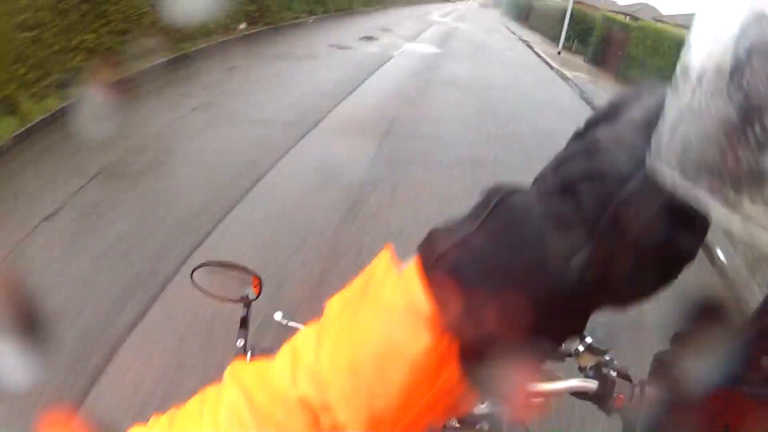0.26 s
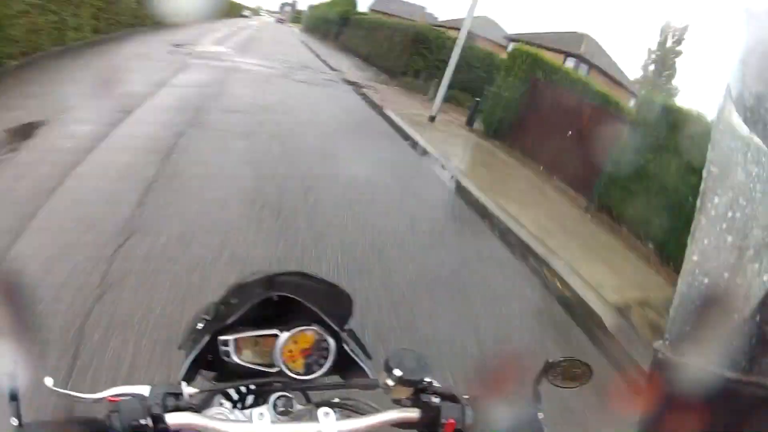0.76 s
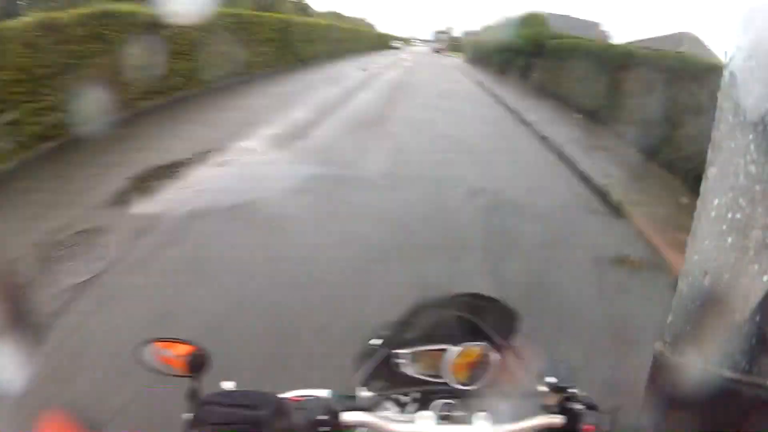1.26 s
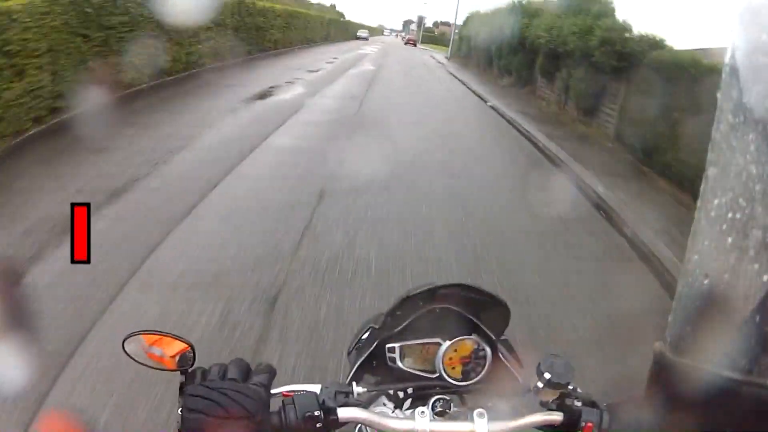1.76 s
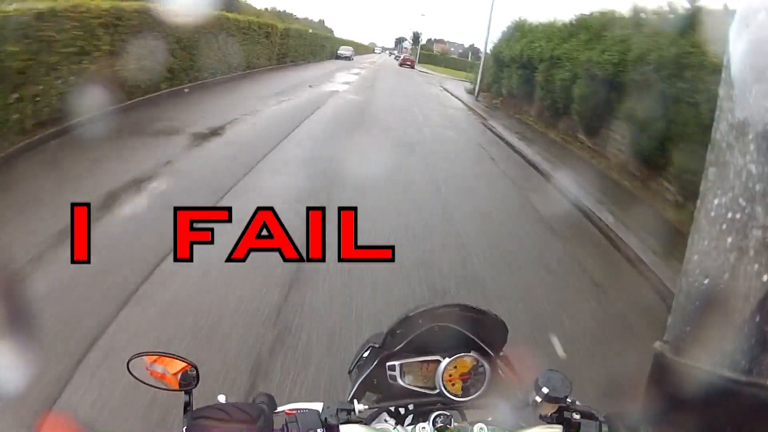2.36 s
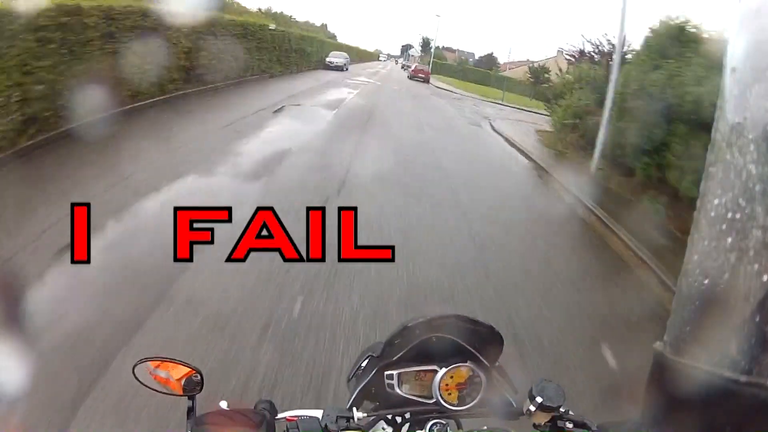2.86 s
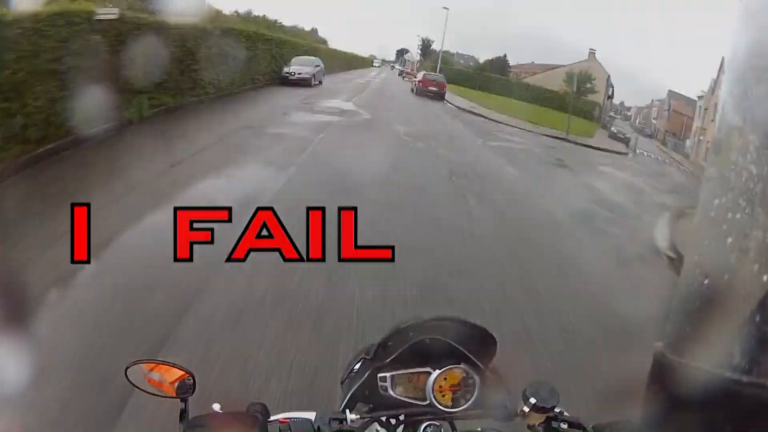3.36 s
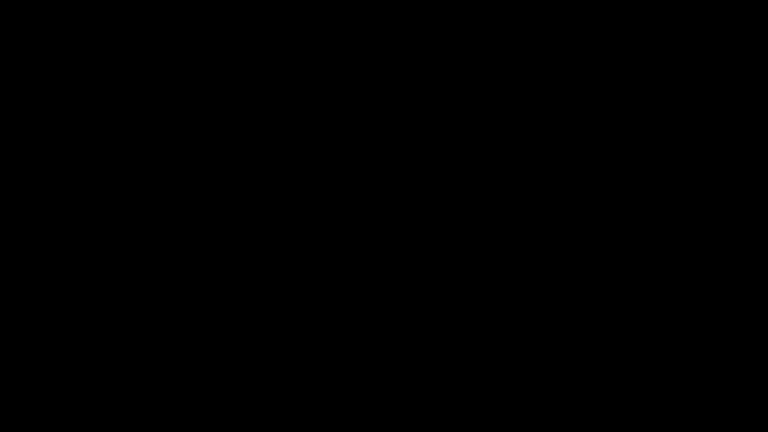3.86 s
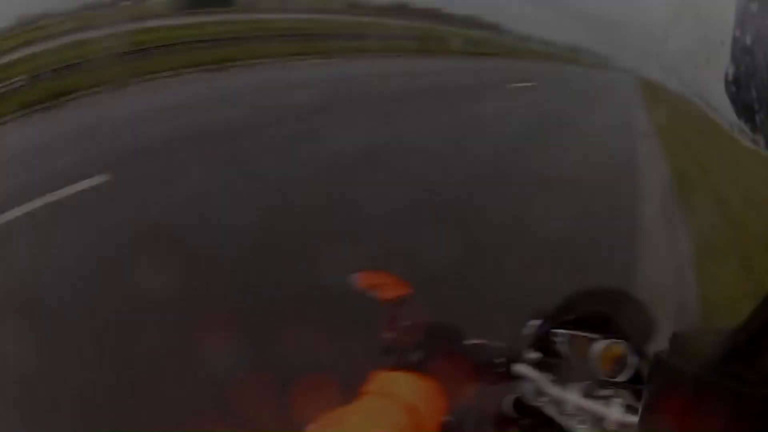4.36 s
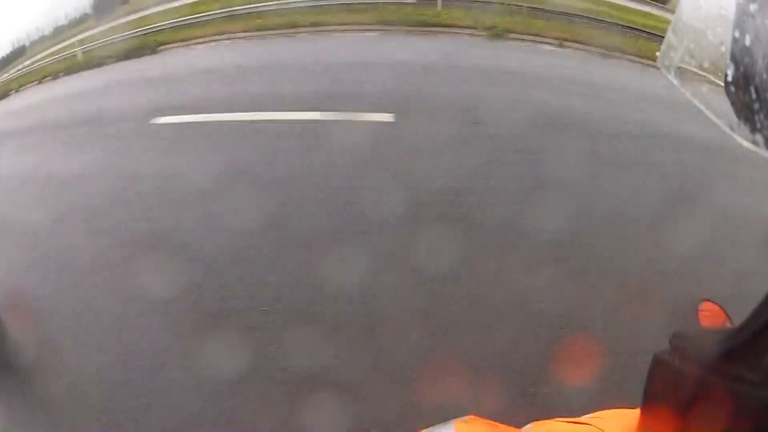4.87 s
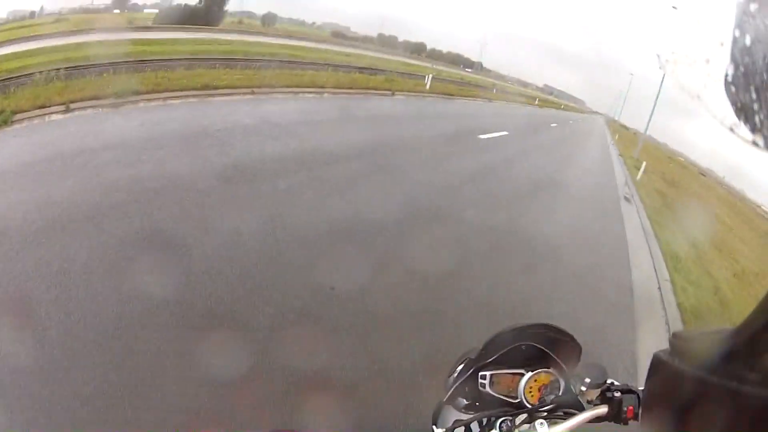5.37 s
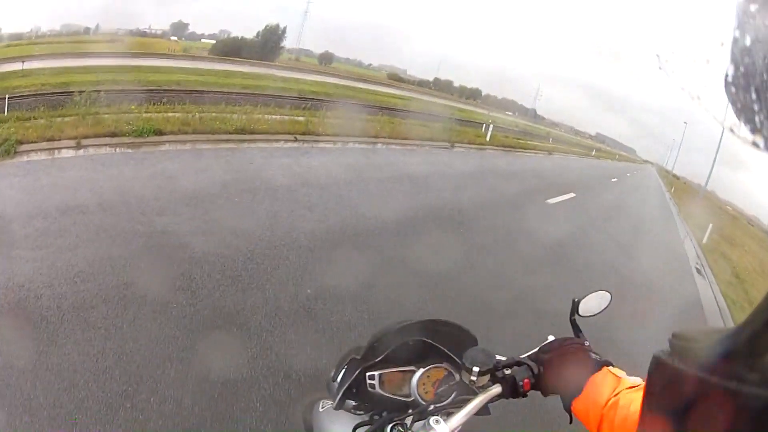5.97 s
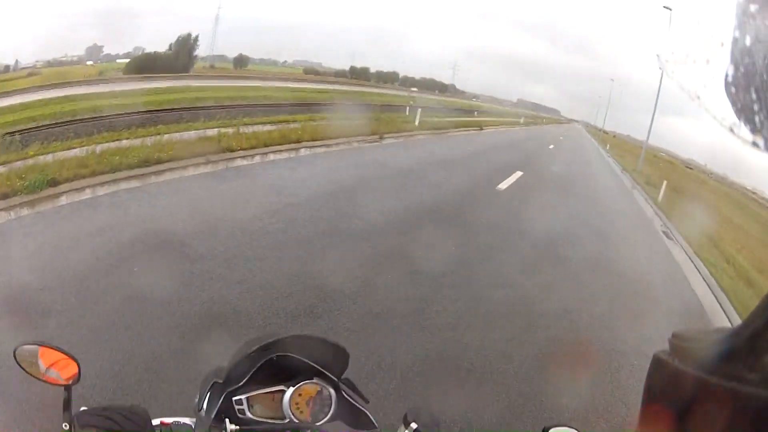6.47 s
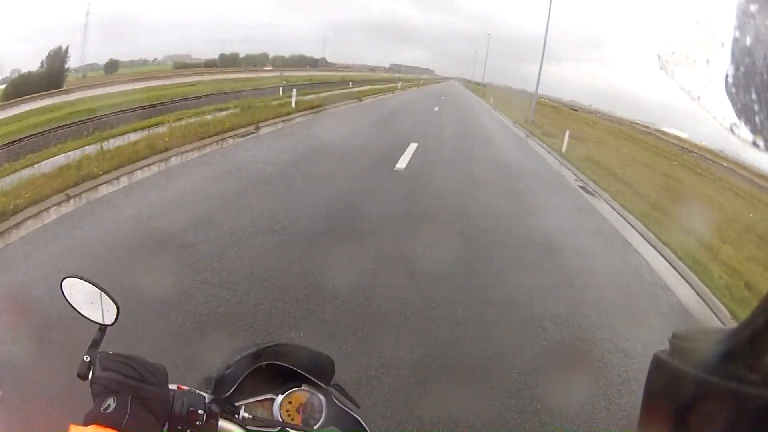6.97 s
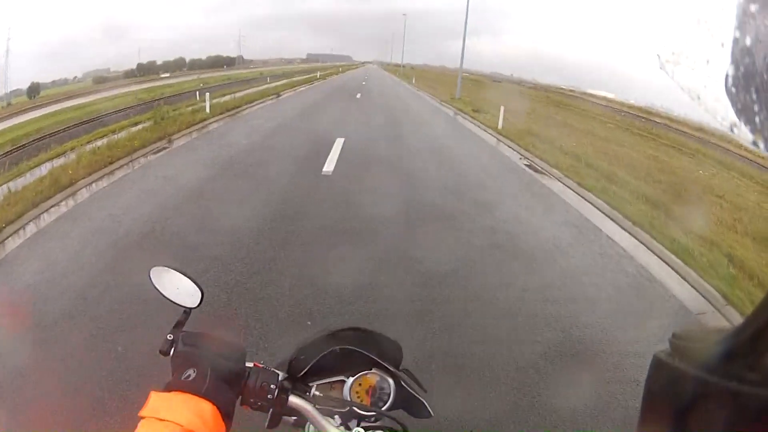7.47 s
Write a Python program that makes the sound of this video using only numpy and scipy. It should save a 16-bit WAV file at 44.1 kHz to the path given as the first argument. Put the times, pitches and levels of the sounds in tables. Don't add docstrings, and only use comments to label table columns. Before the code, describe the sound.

A helmet microphone in a sealed housing hears a fast motorcycle ride in the rain. From 0 s wind buffets and roars, with a high-revving engine drone and a wet glove scrubbing the casing. At about 0.3-0.4 s the glove knocks hard and the level ducks sharply, then recovers as the engine surges again until about 1.1 s. Gusty wind then dominates, with bright raindrop clicks and heavier knocks near 1.4, 2.1, 2.4 and 3.3 s. Around 3.8 s the ride fades out and a much quieter roadside fades in. A second engine rolls up with a low hum and faint whistle; vehicles wash past on wet tyres at about 4.55 and 5 s, the first with a falling note. From 4.7 s to the end the bike idles low and steady, with faint gear whine, light breeze, small rocking rumbles and soft drops. The sound is boxy, gritty and nearly mono.

```python
import sys
import numpy as np
from scipy import signal
from scipy.fft import rfft, irfft, next_fast_len
from scipy.io import wavfile
from scipy.ndimage import uniform_filter1d, map_coordinates

SR = 44100
rng = np.random.default_rng(int(sys.argv[2]) if len(sys.argv) > 2 else 0)


def volts_from_decibels(level):
    exponent = np.asarray(level, float) / 20
    return 10 ** exponent


def put_to_file(sound):
    columns = np.atleast_2d(sound).T
    safe = np.clip(columns, -1, 1)
    whole_steps = np.round(safe * 32767)
    wavfile.write(sys.argv[1], SR, whole_steps.astype(np.int16))


N = 340452


def unit(x):
    return x / np.sqrt(np.mean(x ** 2) + 1e-20)


def along(points, hz):
    f, v = np.transpose(points)
    return np.interp(np.log(hz + 1), np.log(f + 1), v)


def curves(rows):
    s, *cols = np.transpose(rows)
    t = np.arange(N) / SR
    on = uniform_filter1d(1. * ((t >= s[0]) & (t <= s[-1])), size=400)
    return [np.interp(t, s, c) for c in cols] + [on]


def swells(rows):
    t = np.arange(0, N + 32, 32) / SR
    db = sum(rise * np.exp(-((t - s) / half) ** 2) for s, rise, half in rows)
    return np.interp(np.arange(N) / SR, t, db)


def wobble(rate):
    steps = np.arange(0, N + 32, 32)
    knots = rng.standard_normal(int(N * rate / SR) + 4)
    return np.interp(np.arange(N), steps, map_coordinates(knots, [steps * rate / SR]))


def filtered(x, response):
    m = next_fast_len(N + SR // 2)
    return irfft(rfft(x, m) * response(np.fft.rfftfreq(m, 1 / SR)), m)[..., :N]


def rush(response, patchy_db):
    z = signal.stft(rng.standard_normal(N), nperseg=512)[2]
    field = uniform_filter1d(rng.standard_normal(z.shape), size=5, axis=0)
    field = uniform_filter1d(field, size=8, axis=1)
    patchy = signal.istft(z * volts_from_decibels(patchy_db * unit(field)), nperseg=512)[1][:N]
    return unit(filtered(patchy, response))


HOUSING_HZ = [730, 950, 1175, 1600, 2430, 3070, 3710, 4750, 5300]
# width_hz, wind_db, rest_db, traffic_db, struck_db
HOUSING = [(194, -6.5, -5.5, -5.5, -3.5), (220, -5, -1, -2, -16), (221.4, -3, -0.5, 6, -6),
           (702, -10, -2, -3.5, -11), (605, 1, -3.5, -14, 33.5), (657, -9, -11, -19, 6),
           (306, -2.5, -5, -7, 10), (850, -7, -14, -18.5, 4.5), (725, -8, -15.5, -23, -3)]
WIND, REST, TRAFFIC, STRUCK = 1, 2, 3, 4


def resonances(f, column, damping=1):
    peaks = []
    for hz, row in zip(HOUSING_HZ, HOUSING):
        loss = 1j * f * row[0] * damping
        peaks.append(volts_from_decibels(row[column]) * (loss / (hz * hz - f * f + loss)) ** 2)
    return np.array(peaks)


def housing(column):
    return lambda f: np.linalg.norm(resonances(f, column), axis=0)


def shake():
    return rush(lambda f: (f * 11 / (38.6 ** 2 - f * f + 1j * f * 11)) ** 2, patchy_db=1.5)


# pitch_hz, density_db_per_hz
BREEZE = [(56, -36), (95, -4), (156, -9), (225, -14), (330, -16), (573, -23), (700, -25.5), (910, -39),
          (1540, -120)]
# centre_s, rise_db, half_length_s
WAKES = [
    (4.61, 17, 0.076),
    (4.85, 18, 0.41),
]
# centre_s, rise_db, half_length_s
SHIFTS = [(6.0, 8, .1), (6.3, 11, 0.075), (6.68, 15, 0.066), (6.85, 8, 0.045), (7.1, 8, 0.095)]


def roadside():
    wake_db = swells(WAKES)
    breeze_db = -55 + 0.21 * wake_db + 0.67 * wobble(15)
    breeze = volts_from_decibels(breeze_db) * rush(lambda f: volts_from_decibels(along(BREEZE, f)), patchy_db=-0.5)
    hiss = volts_from_decibels(-55.5) * rush(housing(REST), patchy_db=-2.0)
    rocking = volts_from_decibels(-61.5 + wake_db + swells(SHIFTS)) * shake()
    return rocking + breeze + hiss


def whine(table, angle, swell, blur):
    hz, db, on = curves(table)
    tone = np.sin(2 * np.pi * np.cumsum(hz * (1 + blur * wobble(60))) / SR)
    load = np.exp(swell * np.cos(angle + .6 * wobble(25))) * volts_from_decibels(3.2 * wobble(22))
    return on * volts_from_decibels(db) * unit(load * tone)


# closest_s, wash_db, approach_s, departure_s
PASSES = [
    (4.551, -34, 0.06, 0.076),
    (5.0, -43, 0.095, 0.14),
]
# time_s, pitch_hz, level_db
PASSING = [
    (4.45, 760, -64),
    (4.48, 690, -54),
    (4.52, 520, -52),
    (4.56, 400, -55),
    (4.6, 340, -66),
]


def traffic():
    t = np.arange(N) / SR
    near = 0
    for closest, db, approach, departure in PASSES:
        distance = np.abs((t - closest) / np.where(t < closest, approach, departure))
        near = near + volts_from_decibels(db) / (1 + distance ** 3.7)
    spit = volts_from_decibels(0.6 * wobble(25) + 1.5 * wobble(120) + 1.5 * wobble(400))
    wash = near * spit * rush(housing(TRAFFIC), patchy_db=0.6)
    return wash + whine(PASSING, 0, swell=0, blur=.06)


def engine(table, orders, unsteady, flutter_db):
    hz, db, on = curves(table)
    angle = 2 * np.pi * np.cumsum(hz * (1 + unsteady * wobble(7.5))) / SR
    note = 0
    for multiple, level in orders:
        flutter = volts_from_decibels(level + flutter_db * wobble(12))
        note = note + flutter * np.sin(multiple * angle + rng.uniform(0, 2 * np.pi))
    return on * volts_from_decibels(db) * np.sqrt(2) * note, angle


# time_s, cycle_hz, level_db
CRUISE = [(0.0, 136.6, -25.5), (0.25, 137.8, -35), (0.34, 144, -58), (0.5, 143, -45), (0.572, 142.8, -27.5),
          (0.952, 150.2, -31.5), (1.1, 144.6, -56)]
# cycle_multiple, level_db
CRUISE_ORDERS = [(1, -12), (2, -9), (3, -17)]


def cruising():
    return engine(CRUISE, CRUISE_ORDERS, unsteady=0.0053, flutter_db=1.5)[0]


# time_s, cycle_hz, level_db
ARRIVING = [(3.885, 43.24, -48), (4.2, 42.54, -47.5), (4.435, 40.1, -47.5), (4.541, 39.8, -48),
            (4.59, 42.1, -40), (4.72, 39.9, -59)]
IDLE = [(4.7, 27.3, -51.5), (4.95, 28.66, -45.5), (5.14, 29.25, -48), (5.41, 29.84, -47.5),
        (6.5, 29.08, -49.5), (6.62, 29.45, -49), (7.16, 29.45, -50.5), (7.72, 28.9, -48.5)]
# cycle_multiple, level_db
ARRIVING_ORDERS = [(1, -19), (2, -0.5), (3, -10), (4, -17), (5, -23), (6, -9), (7, -39)]
IDLE_ORDERS = [(1, -31), (2, -3.5), (3, -0.5), (4, -16.5), (5, -13), (6, -15.5), (7, -12), (8, -16),
               (9, -59)]
# time_s, pitch_hz, level_db
WHINE = [(5.1, 1945, -59), (5.87, 1985, -61), (6.21, 1930, -62), (6.65, 1955, -60), (7.72, 1925, -60)]
WHISTLE = [(3.9, 1345, -62), (4.74, 1310, -62)]


def standing_engines():
    arriving, near = engine(ARRIVING, ARRIVING_ORDERS, unsteady=0.003, flutter_db=1.0)
    idle, turn = engine(IDLE, IDLE_ORDERS, unsteady=0.0097, flutter_db=-0.5)
    _, near_db, on = curves(ARRIVING)
    intake = on * volts_from_decibels(near_db - 25) * rush(lambda f: np.exp(-((f - 2550) / 260) ** 2), patchy_db=2.5)
    gears = whine(WHINE, turn, swell=1.25, blur=.02)
    whistle = whine(WHISTLE, near / 2, swell=1.0, blur=.011)
    return arriving + intake + idle + gears + whistle


def contacts(table, lowest_db):
    out, t = np.zeros(N + SR), np.arange(2048) / SR
    f = np.fft.rfftfreq(len(t), 1 / SR)
    shape = volts_from_decibels(-60 * t / 0.008) * (1 - np.exp(-t / 0.0007))
    peaks = resonances(f, STRUCK, damping=1.24)[1:]
    for (s, db, low_db, high_db), noise in zip(table, rng.standard_normal((len(table), len(t)))):
        spot = volts_from_decibels(3 * noise[-len(peaks):, None])
        colours = np.add.reduceat(peaks * spot, [0, 2, 4, 6])
        spray = 0.55 * rfft(shape * noise) / np.linalg.norm(shape)
        rings = irfft((1 + spray) * colours)
        rings /= np.abs(rings).max(axis=1)[:, None]
        levels = volts_from_decibels(db + np.array([low_db + lowest_db, low_db + 2.5, -1.5, high_db - .3]))
        out[round(s * SR):][:len(t)] += levels @ rings
    return out[:N]


# start_s, peak_db, low_part_db, high_part_db
RIDE_DROPS = [(0.0424, -18.5, -13.5, 6), (0.0782, -24, -7.5, -14.5), (0.5422, -33.5, 6.5, -4),
              (0.7096, -12, -17, 1.5), (0.843, -17, -25.5, -17), (1.3113, -17.5, 0, 3.5),
              (1.3535, -15, -25.5, 7.5), (1.3679, -5, -14, -2), (1.5112, -17, -20.5, 1),
              (1.8217, -9, -8, -0.5), (2.0966, -5, -11, -3), (2.4391, -6.5, -26, 3.5),
              (2.6491, -10.5, -20, 0), (3.3013, -6, -12, 0), (3.3765, -24.5, -2, 11), (3.4116, -13, -10, 1),
              (3.435, -16, 2.5, -4), (3.491, -10.5, -17, -11.5)]
REST_DROPS = [(3.9626, -46, 3.5, -25), (4.375, -46.5, 0.5, -22.5), (4.4664, -49.5, -0.5, -15),
              (4.5645, -31.5, -2.5, -17), (4.6199, -34, 1, -23), (4.6508, -42.5, 2.5, -18),
              (4.752, -24, -10.5, -10.5), (5.1878, -43.5, 4, -14), (5.2864, -33.5, -1, -6.5),
              (5.6035, -18.5, -3, -22.5), (5.711, -40.5, 0, -7), (6.1638, -24, -4.5, -1),
              (6.571, -51, 7, -12), (6.6049, -28, 0, -20.5), (6.784, -46, 1.5, -2), (6.7892, -39.5, -1, -4),
              (6.7984, -45.5, 4, -12.5), (6.846, -54.5, 8, -14), (6.8697, -41.5, -2.5, -14.5),
              (6.8927, -30, 4, -22), (7.028, -37.5, -5.5, -1.5)]


def rain():
    return contacts(RIDE_DROPS, lowest_db=-5) + contacts(REST_DROPS, lowest_db=-8)


# start_s, peak_db, low_part_db, high_part_db
GLOVE = [
    (0.3235, -34.5, 14, -11),
    (0.355, -17, 1, -10.5),
    (0.402, -2.5, -17, -4.5),
    (0.409, -11.5, 0, 5),
]
# time_s, level_db
RUB = [(0, -40), (.2, -39.5), (.3, -40.5), (.42, -28)]


def glove():
    db, on = curves(RUB)
    rub = on * volts_from_decibels(db + 6.0 * wobble(60)) * rush(housing(TRAFFIC), patchy_db=1.5)
    return contacts(GLOVE, lowest_db=3) + rub


# start_s, peak_db, t60_s, gain_duck_db
KNOCKS = [(0.325, 3.5, 0.057, -0.5), (0.356, -7, 0.25, 3.5), (0.408, 1.5, 0.09, 35.5),
          (1.367, -10, 0.01, 9), (2.098, -3, 0.023, 5.5), (2.44, 7, 0.009, 7), (3.3018, 11.5, 0.0084, 7),
          (4.598, -22.5, 0.024, 0.5), (7.032, -32, 0.064, -1)]
# pitch_hz, level_db, ring_time_share
SHELL = [(179, -1, 1), (341, -18, 1), (722, -7.5, 0.25), (1170, -22, 0.19)]


def knocks():
    u = np.arange(SR // 2) / SR
    thuds, duck_db = np.zeros(N + SR), np.zeros(N + SR)
    for s, db, t60, duck in KNOCKS:
        ring = sum(volts_from_decibels(level - 60 * u / (t60 * share)) * np.sin(2 * np.pi * hz * u)
                   for hz, level, share in SHELL)
        start = round(s * SR)
        thuds[start:][:len(u)] += volts_from_decibels(db) * (1 - np.exp(-u / 0.0025)) * ring
        duck_db[start:][:len(u)] -= duck * np.exp(-u / 0.081) * (u > .009)
    return thuds[:N], volts_from_decibels(uniform_filter1d(duck_db[:N], size=500))


# time_s, rush_db
AIRSPEED = [(0, -33), (.4, -35), (.65, -28), (.8, -31), (1.1, -32), (1.35, -28), (1.8, -28.5), (2.6, -26.5),
            (3.5, -27), (3.7, -30.5), (3.9, -35.5)]
# centre_s, rise_db, half_length_s
GUSTS = [(.03, 4, 0.12), (.24, 14.5, 0.24), (.6, 2, 0.091), (1.1, 6.5, 0.14), (1.33, 2.5, 0.18),
         (1.97, 2, 0.12), (2.58, 3, .1), (2.9, 4.5, 0.095), (3.09, 3, 0.045), (3.45, 3.5, 0.16)]
# centre_s, rise_db, half_length_s
BUMPS = [(.24, 18, 0.3), (.47, 7, 0.15), (.68, 13, 0.03), (1.1, 6.5, 0.16), (1.33, 11, 0.048),
         (1.86, 0.5, 0.024), (2.0, 11, .05), (2.18, 15, 0.061), (2.35, 12, 0.052), (2.55, 8.5, 0.16),
         (2.93, 8, 0.087), (3.1, 10, 0.053), (3.45, 7, 0.17), (3.68, 12.5, 0.048)]
# pitch_hz, density_db_per_hz
BUFFET = [(29, -29.5), (50, -20.5), (70, -3), (167, 0.5), (492, -16), (537, -18.5), (627, -22),
          (700, -15.5), (910, -21.5), (1540, -120)]
# start_s, end_s
FADE_OUT = (3.806, 3.873)


def wind():
    rush_db, _ = curves(AIRSPEED)
    side_db = swells(GUSTS)
    gust = wobble(14)
    lumps = volts_from_decibels(0.45 * gust + 1.42 * wobble(29.68))
    eddies = unit(lumps * rush(lambda f: volts_from_decibels(along(BUFFET, f)), patchy_db=-1.0))
    deep = filtered(eddies, lambda f: 1 / (1 + (f / 236) ** 8))
    buffet = volts_from_decibels(rush_db - 2.5 + side_db) * unit(deep)
    flap = volts_from_decibels(rush_db - 7 + 0.73 * side_db) * unit(eddies - deep)
    roar_db = rush_db + 0.5 + 0.63 * gust + 0.57 * wobble(90)
    roar = volts_from_decibels(roar_db) * rush(housing(WIND), patchy_db=0.95)
    rocking = volts_from_decibels(rush_db - 8.5 + swells(BUMPS)) * shake()
    fade = np.interp(np.arange(N) / SR, FADE_OUT, [1, 0])
    return fade * (rocking + buffet + flap + roar)


# start_s, end_s
FADE_IN = (3.86, 4.39)


def scene():
    fade = np.interp(np.arange(N) / SR, FADE_IN, [0, 1])
    thuds, gain = knocks()
    mono = fade * (roadside() + traffic() + standing_engines())
    mono = mono + cruising() + rain() + glove() + thuds + wind()
    return gain * np.array([mono + volts_from_decibels(-31) * thuds, mono - volts_from_decibels(-27.5) * thuds])


def roll_off(x):
    return signal.sosfilt(signal.butter(12, 16510, fs=SR, output="sos"), x)


# pitch_hz, gain_db
LIFT = [(5000, 1.5), (8500, 3.5), (10000, 8), (11200, 6), (11600, -11), (12000, 7), (12500, 0.5),
        (12900, 7), (14500, 5.5)]


def record(dry):
    chip_hz = 12000
    base = filtered(dry, lambda f: 1 / np.sqrt(1 + (f / 5500) ** 24) * (f < chip_hz / 2))
    t = np.arange(N) / SR
    image_db = -3 * (t > 3.88)
    images = base * (1 + 2 * volts_from_decibels(image_db) * np.cos(2 * np.pi * chip_hz * t))
    held = filtered(images, lambda f: np.sinc(f / chip_hz) * volts_from_decibels(along(LIFT, f)) * (f < 15280))
    return roll_off(np.clip(held, -1, 1))


dry = scene()
out = record(dry)
put_to_file(out)
```